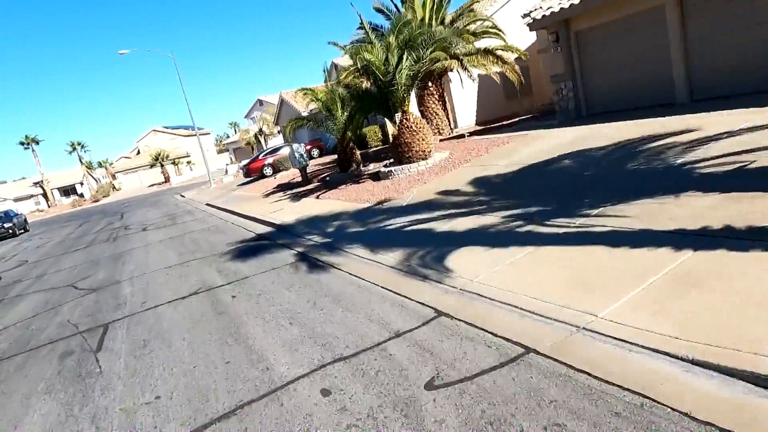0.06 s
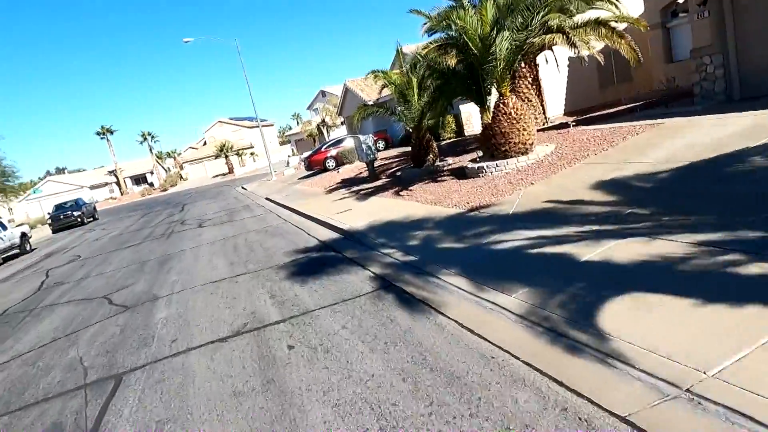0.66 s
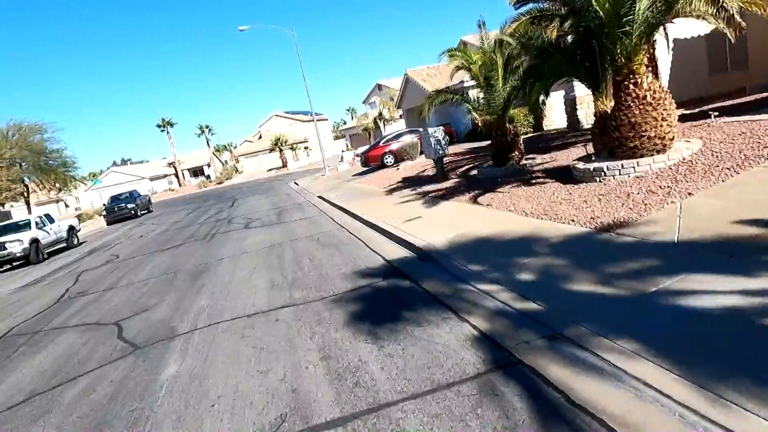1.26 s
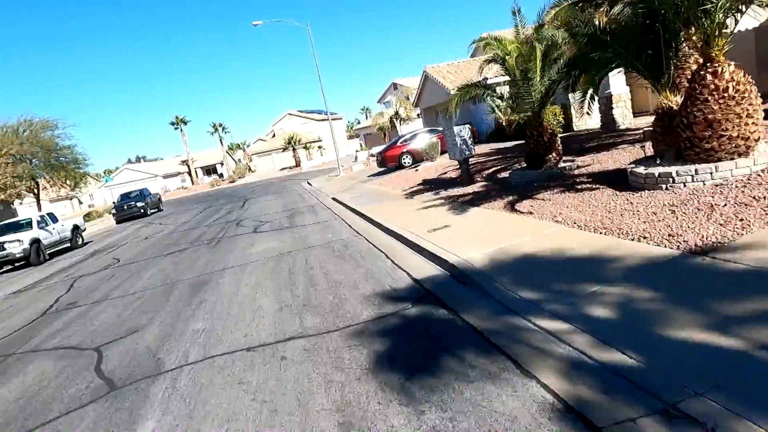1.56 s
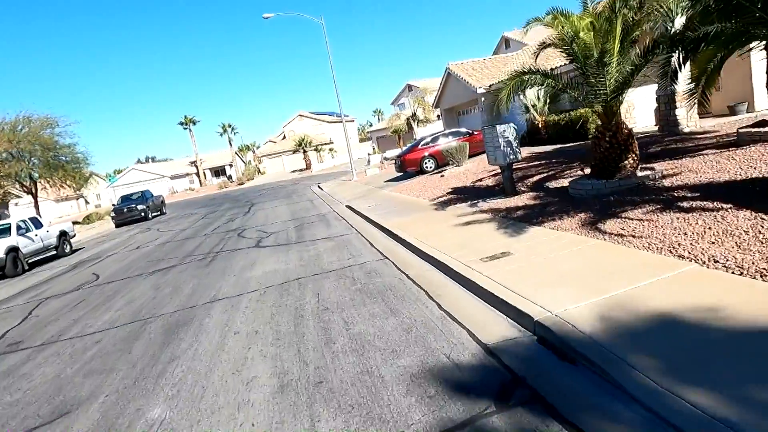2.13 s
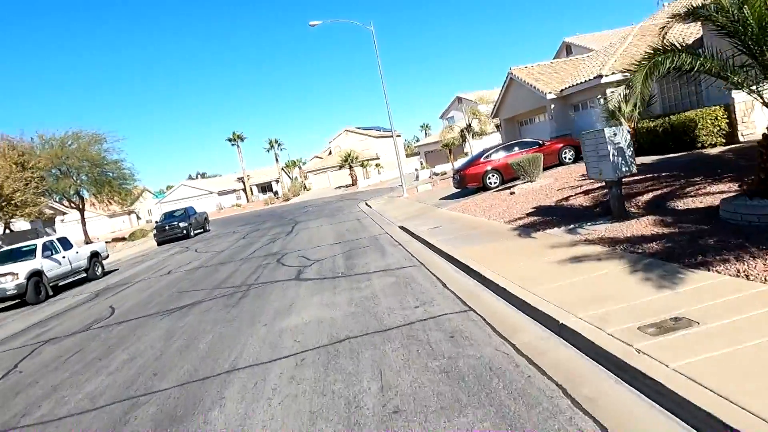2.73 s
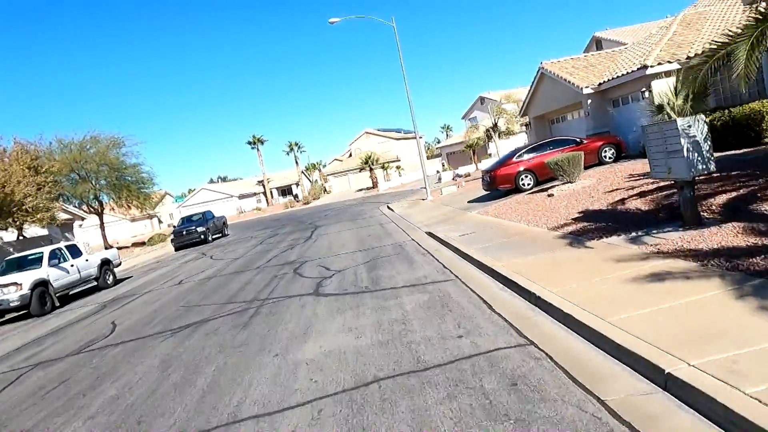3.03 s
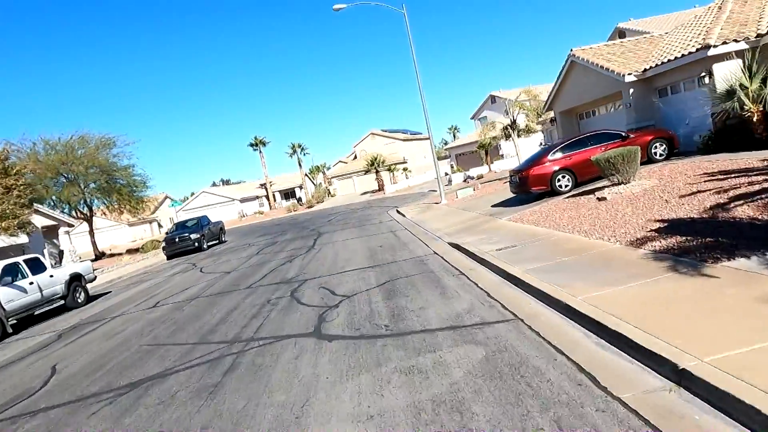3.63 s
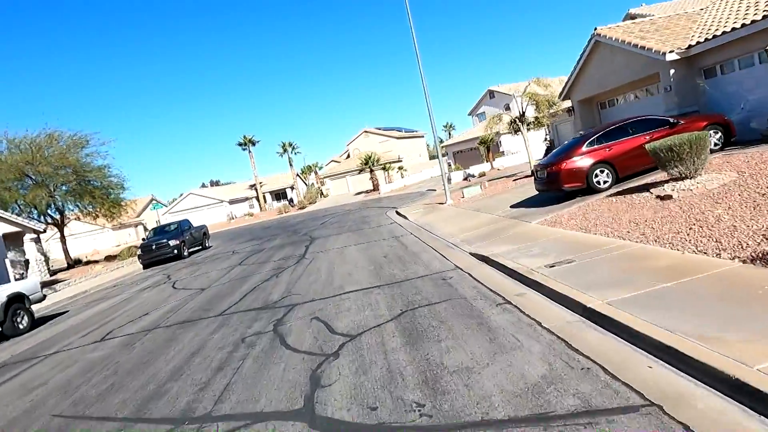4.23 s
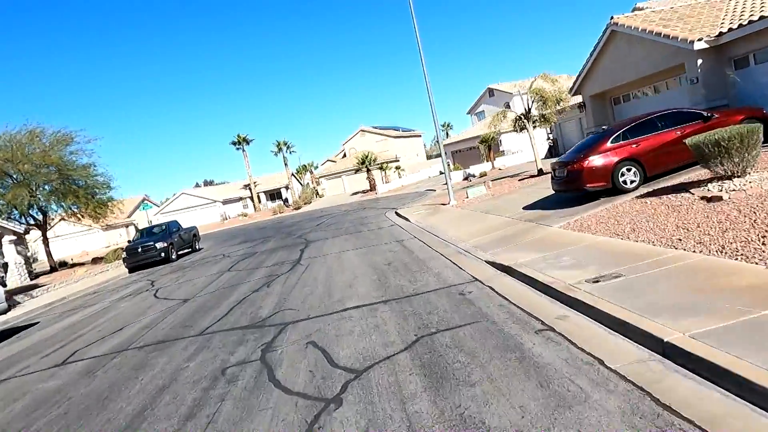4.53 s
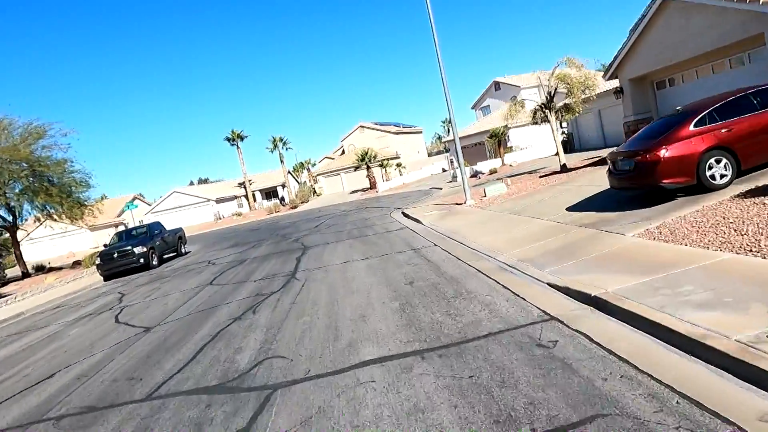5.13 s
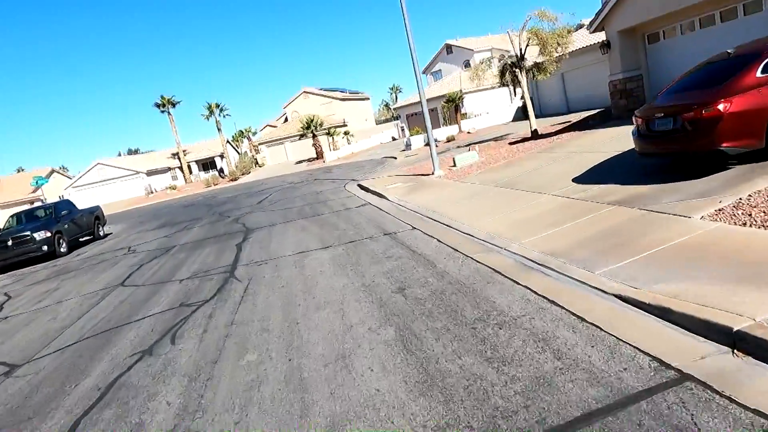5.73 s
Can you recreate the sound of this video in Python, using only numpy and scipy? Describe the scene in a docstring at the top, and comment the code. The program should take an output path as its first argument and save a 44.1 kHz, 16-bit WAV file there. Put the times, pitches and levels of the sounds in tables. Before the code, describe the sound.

An electric skateboard rolls steadily over rough asphalt, thudding and rattling across cracks while wind buffets the microphone.

```python
"""Wheel roar and wind buffeting: an electric skateboard cruises at steady speed over rough asphalt.
Road grain drums on the wheels, the tread hisses, and the uneven surface keeps the deck droning.
Cracks thud through the deck and rattle the metal trucks; ribbed patches hum, pebbles and grit tick.
Headwind eddies push on the rider's microphone. The motor whines faintly at multiples of its shaft rate."""
import sys
import numpy as np
from scipy import signal
from scipy.fft import rfft, irfft, next_fast_len
from scipy.io import wavfile
from scipy.ndimage import uniform_filter1d, map_coordinates

SR = 44100
rng = np.random.default_rng(int(sys.argv[2]) if len(sys.argv) > 2 else 0)


def materialize(psi):
    """Save the field psi as 16-bit PCM at rate SR to the path in sys.argv[1].

    A 1-D psi becomes a single channel; in a 2-D psi each row is a channel.
    """
    bounded = np.clip(np.atleast_2d(psi).T, -1, 1)
    quanta = np.round(bounded * 32767).astype(np.int16)
    wavfile.write(sys.argv[1], SR, quanta)


N = 255090

# Asphalt coarseness: (time [s], relative roar level [dB], relative hiss level [dB])
ASPHALT_LEVELS = [(0.05, -34, -56), (1.18, -36, -59.5), (1.86, -34.5, -60), (2.24, -36.5, -60.5),
                  (3.14, -36, -62.5), (3.85, -36.5, -61), (4.38, -36.5, -61.5), (5.08, -35, -61),
                  (5.75, -37, -61)]
# Wheel roar: (frequency [Hz], relative density [dB])
ROAR_SPECTRUM = [(60, -15), (100, -3.5), (135, -3), (180, -4), (235, -4), (310, -0.5), (360, -3.5),
                 (520, -7), (620, -10), (760, -11.5), (1000, -17.5), (1400, -26), (2000, -35.5),
                 (3000, -41), (8000, -83.5)]
# Tread hiss: (frequency [Hz], relative density [dB])
HISS_SPECTRUM = [(500, -7), (1500, 14.5), (2400, 5.5), (3300, 4), (4600, 0.5), (5300, -3), (6700, -6),
                 (8200, -12.5), (9000, -18.5), (10200, -19.5), (11500, -36), (13000, -32)]
# Headwind strength: (time [s], relative level [dB])
WIND_LEVELS = [(0.0, -28.5), (0.21, -34), (0.31, -24.5), (0.46, -31), (0.58, -25.5), (0.84, -29),
               (0.9, -23.5), (0.97, -29), (1.3, -31.5), (1.43, -22.5), (1.6, -35), (1.72, -26.5),
               (1.9, -26.5), (1.97, -33.5), (2.45, -34), (2.75, -31), (3.0, -34), (3.45, -34),
               (3.69, -27.5), (3.99, -33), (4.12, -30), (4.38, -37.5), (4.56, -27), (4.72, -33.5),
               (4.88, -32), (5.07, -29.5), (5.14, -34), (5.26, -29.5), (5.78, -35)]
# Wind buffeting: (frequency [Hz], relative density [dB])
WIND_SPECTRUM = [(10, -3.5), (22, 1.5), (42, -2), (55, -1), (75, -6), (100, -12), (140, -14), (200, -35.5),
                 (300, -29), (600, -57), (2000, -97)]
# Deck flex from road unevenness: (time [s], level [dB])
FLEX_LEVELS = [(0.0, -28.5), (0.5, -30.5), (0.95, -34), (1.15, -34), (1.8, -31.5), (2.05, -36),
               (2.27, -26.5), (2.42, -40), (2.78, -31.5), (3.4, -40.5), (3.75, -33.5), (4.2, -29.5),
               (4.75, -30.5), (4.9, -39), (5.1, -30), (5.3, -36), (5.78, -31.5)]
# Lowest deck modes: (frequency [Hz], width [Hz], gain [dB])
FLEX_MODES = [(83, 19, 2.5), (108.5, 23, -5.5)]
# Deck boom from coarser road waves: (time [s], relative level [dB])
BOOM_LEVELS = [(0.0, -34.5), (0.28, -31.5), (0.4, -38), (0.55, -30), (0.7, -34), (0.78, -48), (1.0, -43),
               (1.08, -33), (1.17, -47), (1.3, -34), (1.54, -38.5), (1.72, -29.5), (1.9, -35.5),
               (2.2, -31.5), (2.33, -35), (2.47, -39.5), (2.65, -36), (2.8, -29.5), (2.9, -37.5),
               (3.55, -35.5), (3.72, -30.5), (3.85, -33), (4.27, -31.5), (4.6, -34), (5.0, -33),
               (5.25, -32.5), (5.4, -37), (5.78, -37)]
# Next deck modes up: (frequency [Hz], width [Hz], gain [dB])
BOOM_MODES = [(147.5, 41, 2), (189.8, 70, -0.5)]
# Deck modes under impact: (frequency [Hz], width [Hz], gain [dB])
THUD_MODES = [(188.6, 52, 16.5), (283, 76, 3.5), (437, 89, -4.5), (547, 80, -8), (640, 330, -11),
              (810, 80, -9)]
# Metal truck modes: (frequency [Hz], width [Hz], gain [dB])
TRUCK_MODES = [(1060, 370, 6), (1410, 280, 6.5), (1740, 97, 19.5), (1950, 330, -2), (2420, 500, -13.5)]
# Crack crossings: (time [s], length [s], thud pitch [Hz], thud level [dB], rattle level [dB])
CRACKS = [(0.612, 0.031, 209, -27.5, -61), (0.670, 0.021, 700, -34, -48), (0.689, 0.015, 620, -31, -56),
          (0.892, 0.019, 640, -39, -58), (0.911, 0.018, 520, -33, -55), (1.576, 0.011, 750, -50, -54),
          (1.612, 0.016, 720, -37.5, -53), (1.76, 0.016, 432, -30, -44), (1.888, 0.022, 573, -36, -55),
          (1.917, 0.014, 600, -39, -59), (1.970, 0.03, 188, -26.5, -58), (2.071, 0.013, 524, -35.5, -53),
          (2.159, 0.027, 600, -38.5, -52.5), (2.22, 0.025, 400, -34, -64), (2.360, 0.031, 520, -37, -51),
          (2.471, 0.022, 494, -34, -48.5), (2.499, 0.025, 453, -33.5, -48), (2.701, 0.041, 434, -32, -57),
          (2.717, 0.029, 200, -28.5, -55), (2.780, 0.023, 160, -31, -57), (3.343, 0.0087, 700, -35, -54),
          (3.754, 0.025, 560, -34.5, -48), (3.972, 0.014, 290, -26, -58), (4.643, 0.035, 270, -33.5, -61),
          (4.988, 0.016, 220, -30, -53)]
# Wheel drops off an edge: (time [s], pitch [Hz], level [dB])
EDGE_KNOCKS = [(0.6740, 756, -30), (0.6880, 640, -28), (0.6925, 580, -24.5), (1.6190, 740, -29),
               (1.7650, 820, -27.5), (1.7710, 310, -18.5), (2.3620, 617, -34), (2.4740, 400, -32),
               (2.7250, 340, -24.5), (2.8830, 700, -34), (3.3470, 600, -32), (4.1560, 700, -36),
               (4.2450, 700, -37)]
# Tread scuffs on crack edges: (time [s], length [s], centre [Hz], width [Hz], level [dB])
TREAD_SCUFFS = [(0.692, 0.010, 3700, 1800, -58), (1.757, 0.006, 4900, 890, -60.5),
                (1.763, 0.018, 2500, 1500, -60), (1.767, 0.006, 3230, 300, -52),
                (2.377, 0.012, 2300, 900, -56), (2.47, 0.019, 2200, 700, -60),
                (2.699, 0.056, 3200, 2200, -57), (3.75, 0.011, 2550, 450, -55),
                (3.968, 0.018, 3000, 2600, -60)]
# Ribbed road: (midpoint [s], length [s], pitch [Hz], roughness [1], level [dB])
RIBBED_PATCHES = [(2.254, 0.24, 150.5, 0.3, -30.5), (3.225, 0.24, 693, 1.2, -40),
                  (3.413, 0.072, 464, 0.13, -38), (4.4, 0.13, 718, 0.3, -46), (4.554, 0.16, 714, 0.2, -42),
                  (4.652, 0.066, 642, 0.3, -38), (4.957, 0.19, 473.5, 0.27, -34),
                  (5.183, 0.46, 441.5, 0.42, -37)]
# Truck clacks on sharp edges: (time [s], level [dB], pitch [Hz])
TRUCK_CLACKS = [(0.581, -44, 1800), (0.684, -32.5, 1770), (0.71, -43, 1720), (1.579, -41.5, 1730),
                (1.624, -42, 1800), (1.765, -40, 1670), (1.777, -45, 1760), (1.861, -45, 1900),
                (1.914, -43, 1700), (1.932, -45, 1620), (2.103, -45, 1780), (2.166, -42, 1730),
                (2.239, -48, 1720), (2.379, -40.5, 1650), (2.476, -42, 1740), (2.508, -43.5, 1760),
                (3.363, -46, 1750), (3.759, -40, 1740), (3.767, -40.5, 1730)]
# Flicked grit: (time [s], peak [dB])
GRIT_TICKS = [(0.7872, -54), (0.8067, -48.5), (0.8157, -53), (4.5664, -48.5)]
# Motor speed: (time [s], shaft rate [Hz])
SHAFT_RATES = [(0, 101.4), (0.75, 102.2), (2.0, 102.7), (2.55, 102.6), (3.15, 102.2), (3.5, 102.55),
               (4.9, 102.6), (5.78, 102.4)]
# Motor effort: (time [s], relative whine level [dB])
WHINE_LEVELS = [(0.0, -56), (0.25, -60), (0.42, -49), (0.54, -61), (0.65, -54), (0.8, -61), (0.93, -51),
                (1.05, -55), (1.22, -68), (1.82, -60), (1.92, -53), (2.12, -57), (2.32, -50), (2.43, -60),
                (2.52, -55), (2.62, -60), (3.2, -63), (3.35, -55), (3.5, -64), (3.63, -55.5), (4.28, -64.5),
                (4.48, -54.5), (4.68, -62), (4.93, -62), (5.04, -54), (5.17, -68), (5.27, -59), (5.4, -57),
                (5.78, -61)]
# Whine partials, slots and magnets at 12 and 14: (order [x shaft rate], gain [dB])
MOTOR_ORDERS = [(7, 1.5), (9, -3.5), (10, -10.5), (11, -1), (12, 6.5), (13, -4.5), (14, -5), (15, -15.5),
                (16, -18), (17, -16)]


def wheels(roar_gain_db=1.17, hiss_gain_db=4.5):
    """Road grain drums on the wheels; the tread hisses as it lifts off."""
    roar_db, hiss_db = curves(ASPHALT_LEVELS)
    load_db = 0.43 * wobble(27)  # the board jiggles on its wheels
    roar = coloured(impacts(rate_hz=6000, spread_db=1.5), ROAR_SPECTRUM)
    hiss = coloured(impacts(rate_hz=20000, spread_db=0.5), HISS_SPECTRUM)
    return amp(roar_db + roar_gain_db + load_db) * roar + amp(hiss_db + hiss_gain_db + load_db) * hiss


def wind(gain_db=2.5):
    """Headwind eddies push on the microphone in lumps."""
    buffeting = steady(coloured(rng.standard_normal(N), WIND_SPECTRUM))
    return amp(curves(WIND_LEVELS)[0] + gain_db) * buffeting


def deck_drone(boom_gain_db=-2):
    """Uneven road flexes the deck in its lowest modes and booms in the next ones."""
    flex = steady(ring(impacts(rate_hz=3000, spread_db=0), FLEX_MODES))
    boom = steady(ring(impacts(rate_hz=3000, spread_db=0.5), BOOM_MODES))
    return amp(curves(FLEX_LEVELS)[0]) * flex + amp(curves(BOOM_LEVELS)[0] + boom_gain_db) * boom


def cracks(knock_s=0.0019):
    """Wheels cross cracks: the deck thuds and knocks, the truck rattles, the tread scuffs."""
    out, t = np.zeros(N), np.arange(SR // 5) / SR
    for start_s, length_s, pitch_hz, thud_db, rattle_db in CRACKS:
        force = judder(t, length_s)
        rattle = struck(TRUCK_MODES, bushings(force), length_s)
        thud = deck_thud(force, pitch_hz, length_s)
        add_at(out, start_s, amp(thud_db) * thud + amp(rattle_db) * rattle)
    impulse = 1.0 * (t == 0)
    for start_s, pitch_hz, db in EDGE_KNOCKS:
        add_at(out, start_s, amp(db) * deck_thud(impulse, pitch_hz, knock_s))
    for start_s, length_s, centre_hz, width_hz, db in TREAD_SCUFFS:
        scuff = struck([(centre_hz, width_hz, 0)], judder(t, length_s), length_s)
        add_at(out, start_s, amp(db) * scuff)
    return out


def judder(t, length_s):
    """Ragged force of a wheel crossing an edge."""
    arch = np.sqrt(abs(np.sin(np.pi * np.clip(t / length_s, 0, 1))))
    return arch * rng.standard_normal(len(t))


def deck_thud(force, pitch_hz, length_s, octave_loss_db=17.5):
    """A wide bump reaches the deck's low modes, a narrow one the high modes."""
    modes = [(hz, width_hz, db - octave_loss_db * np.log2(hz / pitch_hz) ** 2)
             for hz, width_hz, db in THUD_MODES]
    push = signal.lfilter(*signal.butter(2, 1.16 * pitch_hz, fs=SR), force)
    return struck(modes, push, length_s)


def bushings(force, cutoff_hz=1900):
    """The truck's rubber bushings dull a force."""
    return signal.lfilter(*signal.butter(3, cutoff_hz, fs=SR), force)


def wheel_hum(waver_hz=70):
    """Ribbed patches make the wheels hum briefly, rough in level and pitch."""
    out, t = np.zeros(N), np.arange(N) / SR
    for middle_s, length_s, hz, roughness, db in RIBBED_PATCHES:
        swell = np.cos(np.pi * np.clip((t - middle_s) / length_s, -0.5, 0.5))
        shake = unit(1 + roughness * wobble(waver_hz))
        phase_rad = 2 * np.pi * hz * t + roughness * wobble(waver_hz)
        out += amp(db) * swell * shake * np.sin(phase_rad)
    return out


def truck_clacks(clack_s=0.0024, chatter_share=0.094, rest_pitch_hz=1745):
    """Play in a truck closes with one dry, cushioned blow; pitch shifts with load."""
    out, t = np.zeros(N), np.arange(SR // 10) / SR
    for start_s, db, pitch_hz in TRUCK_CLACKS:
        chatter = np.exp(-t / clack_s) * rng.standard_normal(len(t))
        blow = bushings((t == 0) + chatter_share * chatter / np.linalg.norm(chatter))
        modes = [(hz * pitch_hz / rest_pitch_hz, width_hz, gain_db)
                 for hz, width_hz, gain_db in TRUCK_MODES]
        add_at(out, start_s, amp(db) * struck(modes, blow, clack_s))
    return out


def motor(gain_db=-6, flutter_db=2, jitter_rad=0.12):
    """Faint whine of shaft orders, each fluttering with the load."""
    shaft_rad = 2 * np.pi * np.cumsum(curves(SHAFT_RATES)[0]) / SR
    whine = np.zeros(N)
    for order, db in MOTOR_ORDERS:
        strength = amp(db + flutter_db * wobble(16))
        whine += strength * np.sin(order * shaft_rad + jitter_rad * wobble(24))
    return amp(curves(WHINE_LEVELS)[0] + gain_db) * whine


def pebbles(from_s=1.5, to_s=2.7, level_db=-62):
    """Small stones on a worn stretch keep the trucks ticking."""
    t = np.arange(N) / SR
    worn = (t > from_s) & (t < to_s)
    return amp(level_db) * ring(worn * impacts(rate_hz=120, spread_db=1.5), TRUCK_MODES)


def grit(pitch_hz=8400, half_width_s=0.00012, scatter_s=0.005, crumb_gain_db=-11):
    """Wheels flick grit: tiny bright ticks, each in a spray of weaker crumbs."""
    out, t = np.zeros(N), np.arange(N) / SR
    crumbs = [(time_s + scatter_s * offset, db + crumb_gain_db)
              for time_s, db in GRIT_TICKS for offset in rng.standard_normal(7)]
    for time_s, db in GRIT_TICKS + crumbs:
        envelope = np.exp(-((t - time_s) / half_width_s) ** 2)
        out += amp(db) * envelope * np.cos(2 * np.pi * pitch_hz * (t - time_s))
    return out


def impacts(rate_hz, spread_db):
    """Random hits of road grain, rms 1."""
    hits = rng.random(N) < rate_hz / SR
    return unit(hits * rng.standard_normal(N) * amp(spread_db * rng.standard_normal(N)))


def struck(modes, force, length_s):
    """A force rings a body, differently each time; energy equals rms 1 over length_s."""
    varied = [(hz * (1 + 0.022 * rng.standard_normal()), width_hz, db + 1.7 * rng.standard_normal())
              for hz, width_hz, db in modes]
    sound = ring(force, varied)
    return sound * np.sqrt(length_s * SR / np.sum(sound ** 2))


def ring(force, modes):
    """Force through a body's resonances; white noise keeps its level."""
    def response(f):
        body = sum(amp(db) * 1j * f * width_hz / (hz * hz - f * f + 1j * f * width_hz)
                   for hz, width_hz, db in modes)
        cutoff_hz = 1.09 * modes[-1][0]  # soft wheels pass little above the top mode
        body *= signal.freqs(*signal.butter(4, 1, analog=True), worN=f / cutoff_hz)[1]
        return body / np.sqrt(np.mean(abs(body) ** 2))
    return filtered(force, response)


def coloured(x, spectrum):
    """x shaped by (frequency [Hz], level [dB]) points on a log axis, rms 1."""
    hz, db = np.transpose(spectrum)
    return unit(filtered(x, lambda f: amp(np.interp(np.log(f + 1), np.log(hz), db))))


def filtered(x, response):
    """x through a complex frequency response."""
    size = next_fast_len(len(x) + SR // 4)
    return irfft(rfft(x, size) * response(np.fft.rfftfreq(size, 1 / SR)), size)[:len(x)]


def wobble(rate_hz):
    """Smooth random curve with knots at rate_hz."""
    knots = rng.standard_normal(int(N * rate_hz / SR) + 4)
    return map_coordinates(knots, [np.arange(N) * rate_hz / SR])


def curves(rows):
    """Per-sample curve for each column after time."""
    times_s, *columns = np.transpose(rows)
    return [np.interp(np.arange(N) / SR, times_s, column) for column in columns]


def steady(x):
    """x at rms 1, slow swells removed."""
    return x / np.sqrt(abs(uniform_filter1d(x ** 2, size=5000)) + 1e-12)


def unit(x):
    """x at rms 1."""
    return x / np.sqrt(np.mean(x ** 2) + 1e-20)


def amp(db):
    """Decibels to gain."""
    return 10 ** (np.asarray(db) / 20)


def add_at(out, start_s, sound):
    """Mix sound into out from start_s."""
    span = out[round(start_s * SR):][:len(sound)]
    span += sound[:len(span)]


def scene():
    """Board, wind and motor at one microphone."""
    rolling = wheels() + deck_drone() + wheel_hum()
    knocks = cracks() + truck_clacks() + pebbles() + grit()
    return (rolling + knocks + wind() + motor())[None]


def record(dry):
    """Microphone band limit."""
    top_hz = 12800
    return filtered(dry[0], lambda hz: hz < top_hz)[None]


dry = scene()
out = record(dry)
materialize(out)
```